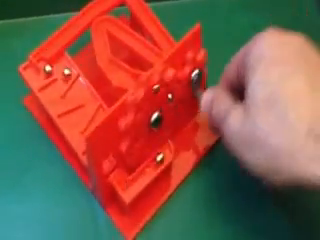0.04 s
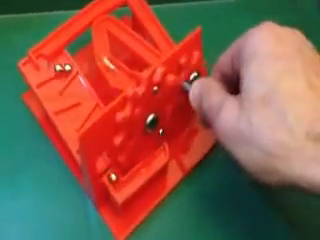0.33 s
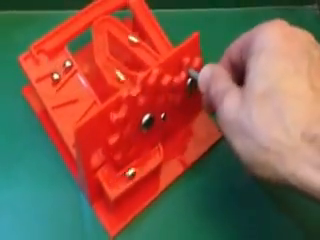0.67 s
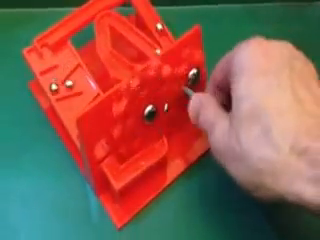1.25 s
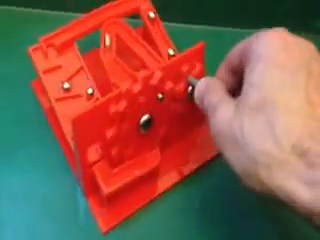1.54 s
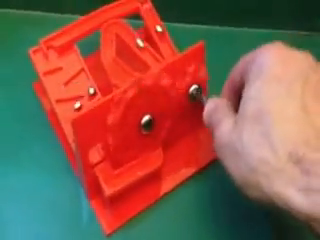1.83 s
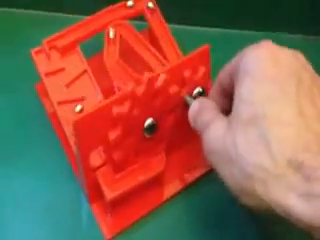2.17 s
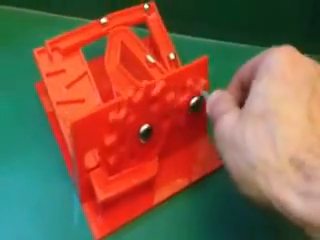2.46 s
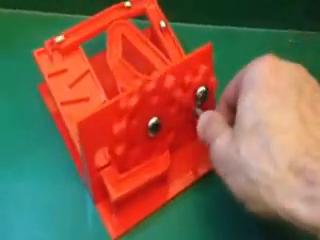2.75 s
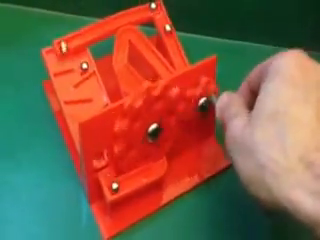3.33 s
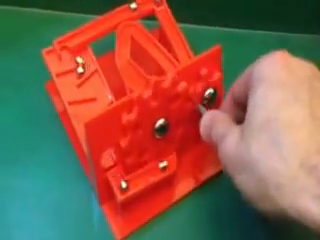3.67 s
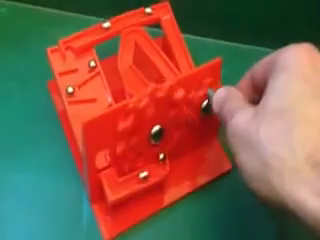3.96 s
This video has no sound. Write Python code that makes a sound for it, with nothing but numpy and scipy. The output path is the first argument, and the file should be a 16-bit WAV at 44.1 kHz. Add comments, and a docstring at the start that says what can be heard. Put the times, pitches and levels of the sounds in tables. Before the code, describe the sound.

Metal marbles clicking and knocking irregularly on hollow plastic ramps, over faintly grinding gears.

```python
"""Steel balls clack down a small hand-cranked plastic marble run, on a mat in a quiet room.
They knock the hollow frame, chatter on, tick against each other, set plates booming as they land
and roll over the ridges of the chutes. The plastic gears of the lift grind underneath.
The frame rings after every contact; the room adds a short tail."""
import sys
import numpy as np
from scipy import signal
from scipy.fft import irfft
from scipy.io import wavfile

SR = 44100
rng = np.random.default_rng(int(sys.argv[2]) if len(sys.argv) > 2 else 0)


def generate_wav(sig):
    """Save sig (samples, or channels by samples) to the path in sys.argv[1] as 16-bit PCM at SR."""
    pcm = np.round(np.clip(np.atleast_2d(sig).T, -1, 1) * 32767).astype(np.int16)
    wavfile.write(sys.argv[1], SR, pcm)


N = 176400
TAPS = 4096

# Spectrum of scraped plastic. Each row: frequency in Hz, relative level in dB.
SCRAPE_COLOUR = [(40, -21.5), (120, -16), (220, -3), (440, -3), (630, 5.5), (1170, -4.5), (1880, 1.5),
                 (2700, -2), (4100, -1.5), (7600, -9.5), (15000, -35)]
# Spectrum of a bright tick. Each row: frequency in Hz, relative level in dB.
TICK_COLOUR = [(500, -58), (4000, 4), (7900, 2), (8700, -5), (10500, -6), (12000, -11.5), (15500, -16)]


def amp(db):
    """Decibels to gain."""
    return 10 ** (np.asarray(db) / 20)


def unit(x):
    """Scale to energy 1."""
    return x / np.sqrt(np.sum(x ** 2) + 1e-20)


def log_interp(points, hz):
    """Interpolate on a log-frequency axis."""
    point_hz, value = np.transpose(points)
    return np.interp(np.log(hz + 1), np.log(point_hz + 1), value)


def add(mix, start_s, sound):
    """Mix a sound in at start_s."""
    part = mix[max(round(start_s * SR), 0):][:len(sound)]
    part += sound[:len(part)]


def wobble(length, step):
    """Random curve through unit-normal knots, step points apart."""
    knots = rng.standard_normal(length)
    return np.interp(np.arange(length) / max(step, 1), np.arange(length), knots)


def grains(length, per_s, spread_db):
    """Random tiny impacts of uneven size."""
    size = amp(spread_db * np.minimum(rng.exponential(1, length), 4)) * rng.choice([-1, 1], length)
    return size * (rng.random(length) < per_s / SR)


def spot_response(colour, detune=1, ripple_db=0):
    """Impulse response of one spot: a colour with random peaks and dips; low bending waves lag."""
    ripple_hz = 200
    bend_delay_s, bend_ref_hz = 0.000462, 4100  # travel time at the reference frequency
    hz = np.fft.rfftfreq(TAPS, 1 / SR)
    ripple = wobble(len(hz), ripple_hz / hz[1]) * hz / (hz + 2 * ripple_hz)
    db = log_interp(colour, hz / detune) + ripple_db * ripple
    log_gain = np.log(amp(np.r_[db, db[-2:0:-1]]))
    log_min_phase = np.conj(signal.hilbert(log_gain))[:len(hz)]
    lag_rad = 4 * np.pi * bend_delay_s * np.sqrt(bend_ref_hz * hz)
    return irfft(np.exp(log_min_phase - 1j * lag_rad))[:TAPS // 2]


def strike(body, echo_db, t60_s, rise_s, chatter_db):
    """One contact, its echoes within the plastic, and the chatter of settling."""
    t = np.arange(TAPS) / SR
    excite = lambda force: unit(signal.fftconvolve(force, body)[:TAPS])
    echoes = rng.standard_normal(TAPS) * amp(-60 * t / t60_s) * np.minimum(t / rise_s, 1)
    chatter_t60_s, chatter_rise_s = 0.066, 0.012
    chatter = grains(TAPS, per_s=700, spread_db=-2.1)
    chatter *= amp(-60 * t / chatter_t60_s) * np.minimum(t / chatter_rise_s, 1)
    hit = unit(excite(signal.unit_impulse(TAPS)) + amp(echo_db) * excite(echoes))
    return (hit + amp(chatter_db) * excite(chatter)) * np.sqrt(0.0035 * SR)  # hit: 3.5 ms at rms 1


def rub(colour, per_s, spread_db, spots=4):
    """Gritty stream of tiny ticks, per_s at each spot; rms 1."""
    out = np.zeros(N)
    for _ in range(spots):
        tick = strike(spot_response(colour), echo_db=2, t60_s=0.016, rise_s=0.00078, chatter_db=-20)
        out += signal.fftconvolve(grains(N, per_s, spread_db), tick)[:N]
    return unit(out) * np.sqrt(N)


def gears():
    """The lift's plastic teeth scrape unevenly as the crank turns."""
    # Grinding contour. Each row: time in seconds, level in dB.
    contour = [(0, -41.5), (.25, -43), (.72, -48.5), (0.979, -42), (1.27, -45), (1.85, -47), (2.45, -46),
               (2.602, -50.5), (2.8, -46.5), (3.151, -48), (3.5, -45), (3.8, -39.5), (3.89, -49)]
    uneven_db, uneven_s = 5, 0.022
    level_db = np.interp(np.arange(N) / SR, *np.transpose(contour))
    level_db += uneven_db * wobble(N, uneven_s * SR)
    return amp(level_db) * rub(SCRAPE_COLOUR, per_s=180, spread_db=2.5)


def clacks():
    """Steel hits a ramp: a brief ring near 4 kHz, a light thud of the frame and a tick."""
    # Hard hits. Each row: start in seconds, level in dB, ring in Hz, tick level in dB.
    hits = [(0.0033, -14, 4250, -17.5), (0.0993, -20, 4100, -27), (0.1575, -31.5, 4150.0, -34),
            (0.1787, -27.5, 4070, -39), (0.2134, -20.5, 5570, -25), (0.233, -27.5, 4020, -29),
            (0.3734, -33, 4400, -21.5), (0.395, -27, 4300, -25.5), (0.6198, -28.5, 3700, -32),
            (0.9743, -23.5, 3620, -31), (1.189, -18.5, 4200, -18.5), (1.3071, -24.5, 3620, -25.5),
            (1.3251, -25, 3520, -27.5), (1.3413, -39, 4420, -25), (1.4833, -19, 3910, -31),
            (1.4943, -33, 3940, -35), (1.5676, -23, 3780.0, -27.5), (1.8125, -19.5, 3840, -28.5),
            (1.8242, -32, 3700, -34), (1.879, -28, 3900, -32), (1.8991, -23, 3700, -30),
            (1.9089, -21.5, 4070, -21.5), (1.9399, -31, 3780, -28), (1.9727, -23, 4600, -27),
            (2.4619, -23.5, 3440, -27.5), (2.773, -22, 4130, -27), (2.8702, -14, 4360, -16.5),
            (2.9661, -20, 4100, -23.5), (2.9775, -32, 4260, -34), (3.0463, -28.5, 4170, -35),
            (3.0928, -27, 4170, -32), (3.1, -20.5, 4080, -27), (3.2601, -26, 3650, -29),
            (3.2698, -23, 4080, -28), (3.2784, -29, 4130, -28.5), (3.4034, -13.5, 4180, -17.5),
            (3.427, -27, 3970.0, -46), (3.4945, -19.5, 4060, -23), (3.5069, -31, 4460, -32),
            (3.5977, -24.5, 4050, -26), (3.6161, -31, 3900, -29), (3.9925, -25.5, 3840, -37)]
    # Clack spectrum before detuning. Each row: frequency in Hz, relative level in dB.
    colour = [(150, -28), (500, -19), (2700, -29), (3400, -10.5), (3800, -1.5), (4100, 3.5), (4500, -4.5),
              (5100, -10), (6000, -33.5), (7600, -15), (15000, -54)]
    colour_peak_hz = 4100
    out = np.zeros(N)
    for start_s, db, ring_hz, tick_db in hits:
        body = spot_response(colour, ring_hz / colour_peak_hz, ripple_db=2)
        crack = strike(body, echo_db=-6, t60_s=0.024, rise_s=0.0013, chatter_db=-16)
        add(out, start_s, amp(db) * (crack + amp(-12) * hollow_thud()) + amp(tick_db) * sharp_tick())
    return out


def hollow_thud():
    """Dull response of the struck hollow plastic."""
    # Body spectrum. Each row: frequency in Hz, relative level in dB.
    colour = [(50, -34), (150, -15), (220, -6), (430, -8), (630, 3.5), (760, -4), (1170, -7.5), (1500, 4),
              (1900, 3), (3000, -3.5), (5000, -28.5), (15000, -46)]
    body = spot_response(colour, ripple_db=5)
    return strike(body, echo_db=7, t60_s=0.043, rise_s=0.001, chatter_db=-7.5)


def sharp_tick(detune=1):
    """Bright snap of a hard contact."""
    body = spot_response(TICK_COLOUR, detune, ripple_db=4.5)
    return strike(body, echo_db=6.5, t60_s=0.022, rise_s=0.00015, chatter_db=-9.5)


def touches():
    """Balls that barely meet give only a high tick."""
    # Steel on steel. Each row: start in seconds, level in dB.
    contacts = [(0.076, -34), (0.2135, -41), (0.5125, -42), (0.9015, -53), (1.787, -46), (2.09, -42.5),
                (2.942, -35.5), (3.077, -40), (3.471, -35), (3.583, -40), (3.8018, -29.5)]
    out = np.zeros(N)
    for start_s, db in contacts:
        add(out, start_s, amp(db) * sharp_tick(detune=2.1))
    return out


def knocks():
    """Blunter hits: the hollow body sounds under a rap and a tick, and the ball chatters on."""
    # Knocks on plastic. Each row: start in seconds, then rap, body and tick levels in dB.
    hits = [(0.0838, -35, -35, -35), (0.1024, -24.5, -46, -23.5), (0.1963, -30, -35, -32),
            (0.3038, -32, -42, -34), (0.3091, -36, -20.5, -18.5), (0.3149, -31, -23.5, -20.5),
            (0.3322, -28.5, -33, -28.5), (0.3781, -19, -20.5, -16), (0.4069, -26, -39, -32),
            (0.4319, -33, -28, -34), (0.525, -24.5, -24, -29), (0.6549, -30, -32.5, -33),
            (0.67, -32, -37.5, -34), (0.786, -37, -36, -41.5), (0.8356, -31, -29, -32.5),
            (0.957, -25, -29.5, -20.5), (1.0437, -33.5, -33.5, -34.5), (1.0915, -25, -22, -21),
            (1.1899, -26, -25, -33), (1.3635, -31.5, -40, -33), (1.4728, -32, -35, -37),
            (1.5483, -30, -24, -26), (1.664, -38.5, -31.5, -37.5), (1.846, -41, -31.5, -30),
            (1.8835, -32, -29.5, -27.5), (2.044, -30.5, -32.5, -35.5), (2.1091, -34, -30.5, -35),
            (2.1294, -44, -28, -30.5), (2.1479, -25.5, -27, -23.5), (2.336, -42, -34, -31),
            (2.3533, -31, -32.5, -31.5), (2.4431, -40, -31, -25), (2.634, -35.5, -36.5, -36.5),
            (2.6796, -38.5, -35.5, -46), (2.7246, -34, -37, -35), (2.8432, -32, -26, -24),
            (3.202, -31, -25.5, -30), (3.227, -27, -31, -28.5), (3.3683, -41, -26.5, -23),
            (3.3846, -24.5, -24.5, -27), (3.452, -34, -38.5, -28.5), (3.5327, -27.5, -29, -31.5),
            (3.5606, -27.5, -27.5, -29), (3.6938, -37, -31.5, -30.5), (3.739, -29.5, -26.5, -35),
            (3.7495, -31, -35, -41), (3.8175, -31, -28.5, -22)]
    # Rap spectrum, peak near 4 kHz. Each row: frequency in Hz, relative level in dB.
    rap_colour = [(300, -27), (2500, -29.5), (3200, 7.5), (4200, 16.5), (5400, 0.5), (6500, -42),
                  (15000, -31.5)]
    out = np.zeros(N)
    for start_s, rap_db, body_db, tick_db in hits:
        rap_spot = spot_response(rap_colour, ripple_db=9)
        rap = strike(rap_spot, echo_db=-11.5, t60_s=0.029, rise_s=0.0023, chatter_db=-12)
        tick_spot = spot_response(TICK_COLOUR, ripple_db=5)
        tick = strike(tick_spot, echo_db=8.5, t60_s=0.036, rise_s=0.00065, chatter_db=-9)
        add(out, start_s, amp(rap_db) * rap + amp(body_db) * hollow_thud() + amp(tick_db) * tick)
    return out


def landings():
    """A dropping ball bends a plate, which booms briefly at its own note."""
    # Heavy landings. Each row: start in seconds, level in dB, plate note in Hz.
    drops = [(0.311, -19.5, 1046), (1.093, -21.5, 1054), (1.19, -26, 630), (1.549, -29.5, 664),
             (3.818, -25.5, 640)]
    t60_s, rise_s = 0.033, 0.0013
    out, t = np.zeros(N), np.arange(TAPS) / SR
    for start_s, db, hz in drops:
        envelope = amp(db - 60 * t / t60_s) * np.minimum(t / rise_s, 1)
        add(out, start_s, envelope * np.sin(2 * np.pi * hz * t))
    return out


def rolling():
    """Balls cross the fine ridges of the chutes: a scrape over a hollow rumble."""
    # Runs down a chute. Each row: start in seconds, length in seconds, level in dB.
    rolls = [(0.348, 0.11, -41.5), (0.538, 0.079, -38), (0.803, 0.078, -42), (0.9, 0.13, -40),
             (1.291, 0.12, -36.5), (1.667, 0.094, -42.5), (1.873, 0.12, -42.5), (2.097, 0.12, -44),
             (2.246, 0.1, -39.5), (3.198, 0.13, -42), (3.53, 0.13, -45)]
    # Chute spectrum. Each row: frequency in Hz, relative level in dB.
    rumble_colour = [(350, -30), (640, 6.5), (1150, -15.5), (1850, 2), (5000, -10), (15000, -45)]
    rise_s, fall_s = 0.013, 0.036
    envelope, t = np.zeros(N), np.arange(N) / SR
    for start_s, length_s, db in rolls:
        ramps = np.minimum((t - start_s) / rise_s, (start_s + length_s - t) / fall_s)
        envelope += amp(db) * np.clip(ramps, 0, 1)
    scrape = rub(SCRAPE_COLOUR, per_s=160, spread_db=2)
    rumble = rub(rumble_colour, per_s=200, spread_db=1.5)
    return envelope * (scrape + amp(-3.5) * rumble)


def frame_ring(contacts):
    """The plates of the frame ring on after every contact."""
    # Frame modes. Each row: frequency in Hz, gain in dB re the direct sound, T60 in seconds.
    modes = [(372.7, -1, 0.15), (629, -5.5, 0.11), (886, -2.5, 0.046), (1432, -14, 0.071), (1850, 1, 0.033),
             (2110, 2, 0.35)]
    t = np.arange(2 * TAPS) / SR
    response = np.zeros(len(t))
    for hz, db, t60_s in modes:
        decay = amp(-60 * t / t60_s)
        response += amp(db) * 2 * decay / decay.sum() * np.cos(2 * np.pi * hz * t)
    return signal.fftconvolve(contacts, response)[:N]


def room(source, tails=3):
    """Short diffuse tails, longest in the bass, crossfaded as the balls move about."""
    band_hz, t60_s = (200, 2000, 6000, 15000), (0.79, 0.2, 0.14, 0.27)
    rise_s, crossfade_hz = 0.027, 1.131
    out = np.zeros(N)
    crossfade_rad = 2 * np.pi * crossfade_hz * np.arange(N) / SR
    for k in range(tails):
        hz, t, noise = signal.stft(rng.standard_normal(SR // 2), SR, nperseg=256)
        decay = amp(-60 * t / log_interp(np.c_[band_hz, t60_s], hz)[:, None])
        tail = signal.istft(noise * decay * np.minimum(t / rise_s, 1), SR, nperseg=256)[1]
        weight = np.cos(crossfade_rad + np.pi * k / tails)
        out += signal.fftconvolve(source * weight, unit(tail))[:N]
    return out * np.sqrt(2 / tails)


def scene():
    """The marble run in its room, mono."""
    contacts = clacks() + knocks() + touches() + landings() + rolling() + gears()
    toy = contacts + frame_ring(contacts)
    return (toy + amp(-13) * room(toy))[None]


def record(dry):
    """Steep low-pass."""
    cutoff_hz = 15450
    lowpass = signal.firwin(255, cutoff_hz, window=("kaiser", 9), fs=SR)
    return signal.oaconvolve(dry, lowpass[None], "same")


dry = scene()
out = record(dry)
generate_wav(out)
```